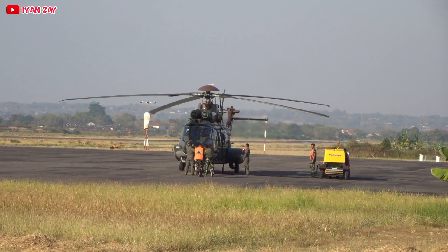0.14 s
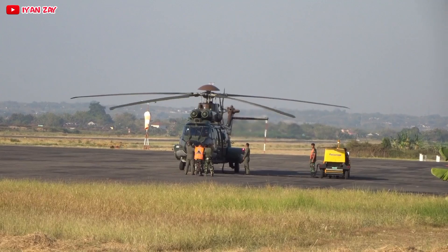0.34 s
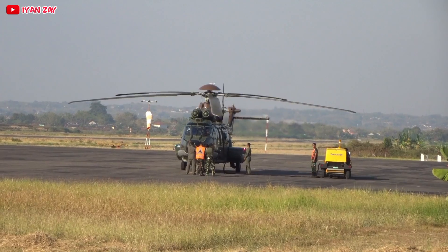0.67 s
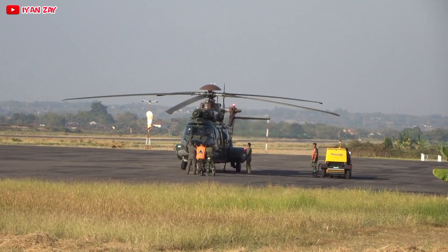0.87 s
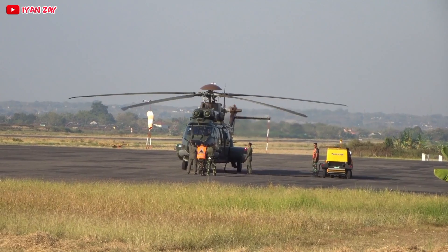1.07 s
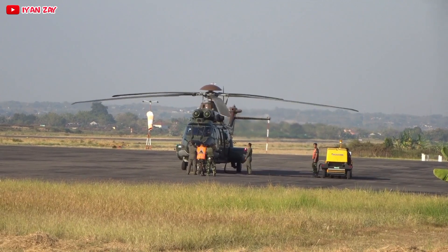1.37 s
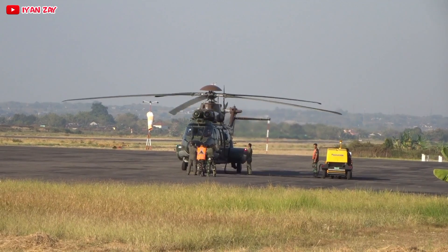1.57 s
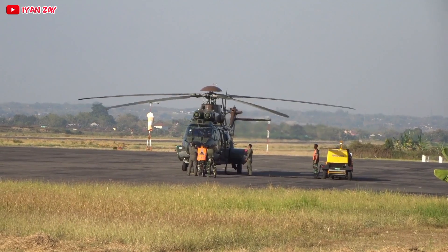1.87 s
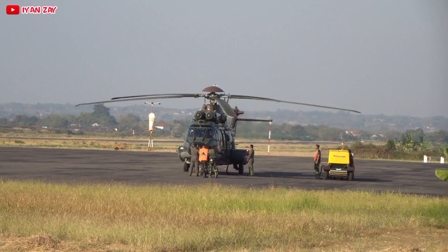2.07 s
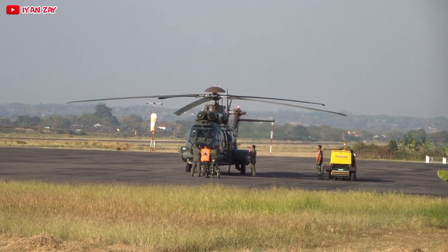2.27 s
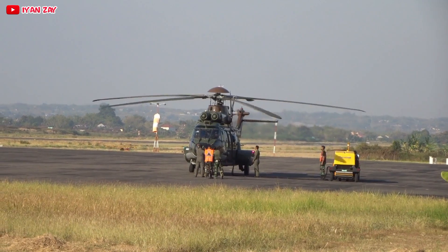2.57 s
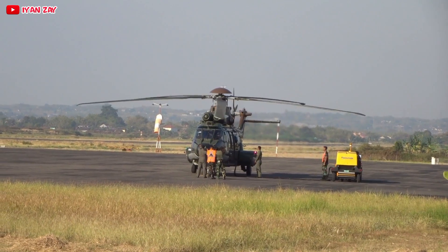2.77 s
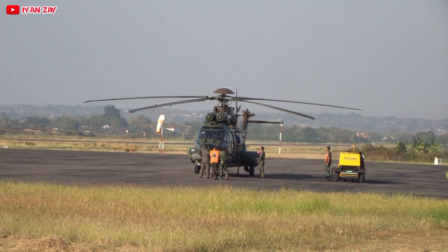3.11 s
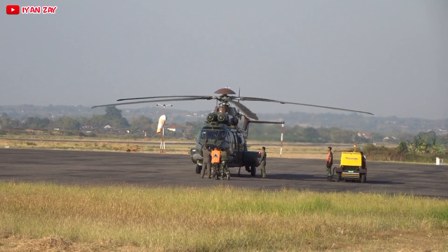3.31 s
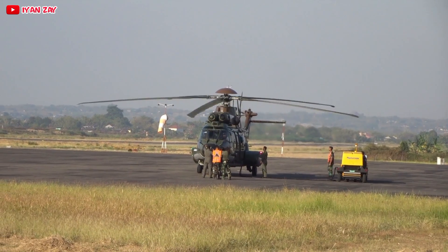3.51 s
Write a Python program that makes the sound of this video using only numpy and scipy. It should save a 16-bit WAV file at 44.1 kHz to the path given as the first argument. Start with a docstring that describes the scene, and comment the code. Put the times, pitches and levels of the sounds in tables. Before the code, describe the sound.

Distant helicopter turbines spool up with fluttering high whines, steady exhaust roar and growing airy rush

```python
"""Three compressor whines climb in pitch and fade in and out in the moving air: a twin-turbine
helicopter runs up on an airfield apron, some way off from the stereo microphones. The whines are tones
with scattered copies; the exhaust roar, its hums and the intake hiss, which swells towards the end,
are coloured noise, and the sliding duct tones are narrow noise. Close by, light gusts (dull noise
bursts) and soft thumps (filtered pulses) reach the microphones."""
import sys
import numpy as np
from scipy import signal
from scipy.fft import irfft
from scipy.io import wavfile

SR = 44100
rng = np.random.default_rng(int(sys.argv[2]) if len(sys.argv) > 2 else 0)


def generate_wav(signal):
    """Clip the signal to [-1, 1] and save it as 16-bit WAV at the path in sys.argv[1]."""
    frames = np.transpose(np.atleast_2d(signal))
    scaled = np.clip(frames, -1, 1) * 32767
    pcm = np.round(scaled).astype(np.int16)
    wavfile.write(sys.argv[1], SR, pcm)


N = 160965
TIME = np.arange(N) / SR   # s
FREQS = np.maximum(np.fft.rfftfreq(N, 1 / SR), 1)   # Hz, kept above zero for the logarithm

# blade-passing pitch of the first engine's lower stage: [t/s, f/Hz]
FIRST_ENGINE_PITCH = [(0, 4040), (.5, 4105), (1, 4183), (1.5, 4271), (2, 4354), (2.5, 4434), (3, 4510),
                      (3.65, 4607)]
# blade-passing pitch of the second engine: [t/s, f/Hz]
SECOND_ENGINE_PITCH = [(0, 7345), (.5, 7470), (1, 7612), (1.5, 7772), (2.5, 8070), (3, 8205), (3.65, 8370)]
# whine of the first engine's lower stage, fading in and out: [t/s, level/dB]
LOWER_STAGE_LEVEL = [(0, -24), (.035, -37), (.065, -29), (.1, -45), (.135, -25.5), (.225, -30), (.28, -26),
                     (.335, -38), (.425, -26), (.51, -38), (.565, -25.5), (.628, -47), (.7, -28.5),
                     (.755, -26.5), (.785, -42), (.815, -25.5), (.853, -40), (.875, -28.5), (.93, -30),
                     (.957, -38), (.985, -32), (1.008, -42), (1.035, -29.5), (1.11, -39), (1.19, -34),
                     (1.22, -26.5), (1.26, -30), (1.285, -38), (1.305, -29), (1.34, -35), (1.42, -35),
                     (1.455, -30.5), (1.505, -41), (1.55, -36), (1.7, -47), (1.98, -38), (2.1, -47),
                     (2.36, -47), (2.44, -36.5), (2.54, -37), (2.65, -46), (3.65, -42)]
# whine of the first engine's upper stage: [t/s, level/dB]
UPPER_STAGE_LEVEL = [(0, -33.5), (.22, -33.5), (.33, -43), (.54, -33), (.93, -47.5), (1.07, -35),
                     (1.65, -36), (2.66, -40), (2.72, -28.5), (2.775, -30.5), (2.82, -40), (2.865, -27.5),
                     (2.91, -39), (3, -27), (3.08, -24.5), (3.15, -24), (3.2, -33), (3.31, -20),
                     (3.425, -25), (3.47, -20.5), (3.55, -22.5), (3.65, -29)]
# whine of the second engine: [t/s, level/dB]
SECOND_ENGINE_LEVEL = [(0, -37), (.4, -38), (.5, -46), (.64, -42), (.76, -47), (1.15, -38.5), (1.5, -30),
                       (1.75, -39), (2.3, -43), (2.42, -31.5), (2.8, -51), (3, -36), (3.15, -49),
                       (3.65, -46)]
# colour of the exhaust roar, before scaling to unit power: [f/Hz, relative density/dB per Hz]
ROAR_COLOUR = [(20, -58), (45, -41), (65, -20), (110, -12.5), (200, -8), (330, -3.5), (590, -3.5),
               (680, 2.5), (810, 2), (900, 1), (1120, 0.5), (1330, 2.5), (1700, 1.5), (2000, -1.5),
               (2800, 0), (5000, -15.5), (11000, -22.5)]
# course of the exhaust roar: [t/s, level/dB]
ROAR_COURSE = [(0, -30.5), (1, -30.5), (2, -29.5), (2.5, -28.5), (3, -26.6), (3.65, -27.5)]
# narrow resonances that hum in the exhaust: [f/Hz, width/Hz, level relative to the roar/dB]
EXHAUST_HUMS = [(559.7, 9.3, -24), (699.4, 12, -18.5), (772, 22, -15), (1307, 36, -17), (1385, 25, -21),
                (1468, 13, -26), (1834, 8.4, -18.5)]
# colour of the intake hiss at low power, before scaling: [f/Hz, relative density/dB per Hz]
HISS_COLOUR = [(1800, -24), (2700, -1), (3400, 4.5), (3900, 5.5), (4450, 0), (5200, -1), (5650, 2),
               (6100, 5.5), (6700, -4), (7200, 1.5), (7900, -1.5), (8500, -11), (9500, -10.5), (11000, -17)]
# course of the intake hiss: [t/s, level/dB]
HISS_COURSE = [(0, -29), (.35, -31.5), (.9, -31), (1.6, -30), (1.9, -32.5), (2.15, -31), (3, -34),
               (3.65, -26)]
# colour of the harder rush that sets in as the air flow grows: [f/Hz, relative density/dB per Hz]
SURGE_COLOUR = [(1900, -31.5), (2600, -6), (3000, -1.5), (3340, 5), (3530, 0.5), (3760, -5.5), (3900, -1.5),
                (4100, 1.5), (4390, -11), (4700, 1.5), (4870, -6), (5150, -20), (5450, -2), (5800, -10.5),
                (6200, -4.5), (6750, 1.5), (7150, -3.5), (7450, -4), (7950, 2.5), (8250, 0), (8450, -10.5),
                (8630, -2), (9050, -16), (11000, -24)]
# course of the harder rush: [t/s, level/dB]
SURGE_COURSE = [(0, -62), (1.9, -33.5), (2.45, -31), (2.72, -26.5), (2.83, -26), (3.05, -21.5), (3.23, -24),
                (3.32, -21), (3.65, -22)]
# duct resonances that sing for a while:
# [middle t/s, length/s, f at the middle/Hz, glide/Hz per s, width/Hz, level/dB]
DUCT_RESONANCES = [(0.075, .44, 7010, -5, 200, -34), (1.349, 0.53, 6070, 200.5, 150, -37),
                   (1.601, 0.12, 3370, -6000, 220, -36), (1.689, 0.17, 2745, -150, 6, -34.5),
                   (1.822, .026, 3320, -25000, 180, -33), (2.301, .77, 6300, 301.5, 270, -34),
                   (2.598, .46, 7860, 205, 140, -31), (2.803, .48, 3420, 0, 130, -37),
                   (2.956, 1.8, 1081, 0, 12, -41), (3.098, 1, 3685, 0.5, 37, -33.5),
                   (3.45, 0.58, 3350, -0.5, 31, -37), (3.558, 0.77, 4740, 152, 270, -31)]
# left-right likeness of the air noise: [f/Hz, correlation]
EAR_LIKENESS = [(40, 0.47), (100, 0.86), (280, 0.8), (700, 0.97), (1500, 0.8), (2900, 0.69), (4500, 0.62),
                (6500, 0.29), (10000, 0.16)]
# stereo balance of the air noise: [f/Hz, left minus right level/dB]
EAR_BALANCE = [(100, -0.5), (700, -0.7), (1400, -2.5), (3000, -.6), (4700, -1.5), (5700, 2.5), (7500, 3.5),
               (10500, 3.5)]
# gusts on the microphones: [middle t/s, length/s, level at the middle/dB]
GUST_BURSTS = [(0.739, .06, -33.5), (0.844, .1, -38), (1.301, 0.027, -36), (1.643, 0.038, -38),
               (2.71, 0.042, -37.5)]
# colour of the gusts, before scaling: [f/Hz, relative density/dB per Hz]
GUST_COLOUR = [(40, -32), (110, -7.5), (190, 4), (330, 1.5), (580, -1.5), (1000, -5), (4000, -58)]
# soft low thumps at the microphones: [start t/s, centre f/Hz, peak level/dB]
THUMP_PULSES = [(.303, 210, -26.5), (.668, 420, -19), (.695, 340, -19), (0.7, 280, -25), (.734, 430, -20),
                (0.747, 270, -23), (.825, 220, -24.5), (1.208, 240, -24.5), (1.306, 300, -25),
                (1.657, 330, -24.5)]

UPPER_STAGE_RATIO = 17 / 11   # upper stage pitch over lower stage pitch
SCATTER_HZ = 23.6   # spread of the sound scattered by the air
SKIRT, SKIRT_HZ = 0.15, 74.6   # depth (re the steady tone) and rate of the flow's faster unsteadiness
FIRST_SCATTER, SECOND_SCATTER = 0.35, 0.46   # scattered sound relative to the steady tone, per engine
SECOND_PAN_DB = -0.5   # left minus right
AIR_LEFT_LAG_S = 1.4e-5   # air noise reaches the right microphone a little sooner
THUMP_SPAN = 1.76   # a thump's band reaches this factor below and above its centre
THUMP_RIGHT_LAG_S = 0.00053   # thumps reach the left microphone first
THUMP_LOW_CUT_HZ = 140   # little of a thump passes below this
CUTOFF_HZ = 11060   # top of the recorded band


def from_db(db):
    """Decibels to amplitude gain."""
    return 10 ** (np.asarray(db) / 20)


def rms_one(x):
    """Scale to unit power, over both channels together."""
    return x / np.sqrt(np.mean(np.abs(x) ** 2) + 1e-20)


def in_time(rows):
    """Read a time curve at every sample."""
    return np.interp(TIME, *np.transpose(rows))


def by_frequency(rows):
    """Read a spectrum table at every frequency, along a logarithmic axis."""
    hz, value = np.transpose(rows)
    return np.interp(np.log(FREQS), np.log(hz), value)


def pan(db):
    """Left and right gains for a left-minus-right level difference."""
    return from_db(np.array([[1], [-1]]) * db / 2)


def swell(middle, length):
    """Bell-shaped envelope that peaks at one."""
    return np.exp(-2 * ((TIME - middle) / length) ** 2)


def resonance(hz, width):
    """Narrow spectral peak of unit power."""
    return rms_one(1 / (1 + 2 * ((FREQS - hz) / width) ** 2))


def flutter(rate_hz):
    """Two unrelated slow random signals of unit spread, their spectrum falling above the rate."""
    real, imag = rng.standard_normal((2, 2, len(FREQS)))
    spectrum = (real + 1j * imag) / (1 + (FREQS / rate_hz) ** 2)
    return rms_one(irfft(spectrum, N))


def air_spectrum(gain):
    """Spectrum of stereo turbulence: random, coloured, less alike at the two ears towards the treble."""
    real, imag = rng.standard_normal((2, 2, len(FREQS)))
    mid, side = real + 1j * imag
    alike = np.clip(by_frequency(EAR_LIKENESS), -1, 1)
    both = np.sqrt(1 + alike) * mid + np.sqrt(1 - alike) * side * [[1], [-1]]
    both[0] *= np.exp(-2j * np.pi * FREQS * AIR_LEFT_LAG_S)
    return both * gain * pan(by_frequency(EAR_BALANCE))


def air_noise(gain):
    """Stereo turbulence as sound of unit power."""
    return rms_one(irfft(air_spectrum(gain), N))


def whine(pitch_hz, level, left_lead_rad, scatter):
    """Blade-passing tone plus scattered copies, different at each ear, and a faster shared unsteadiness."""
    scattered = scatter * (flutter(SCATTER_HZ) + 1j * flutter(SCATTER_HZ)) / np.sqrt(2)
    depth, wobble = SKIRT * flutter(SKIRT_HZ)
    phase = 2 * np.pi * np.cumsum(pitch_hz) / SR
    carrier = np.exp(1j * (phase + np.array([[left_lead_rad], [0]])))
    tone = (carrier * (1 + scattered + depth + 1j * wobble)).real
    return from_db(in_time(level)) * rms_one(tone)


def compressors():
    """Two stages locked in ratio on the first engine's shaft, and one tone from the second engine."""
    first_hz = in_time(FIRST_ENGINE_PITCH)
    second_hz = in_time(SECOND_ENGINE_PITCH)
    lower = whine(first_hz, LOWER_STAGE_LEVEL, left_lead_rad=-0.75, scatter=FIRST_SCATTER)
    upper = whine(first_hz * UPPER_STAGE_RATIO, UPPER_STAGE_LEVEL, left_lead_rad=-0.93, scatter=FIRST_SCATTER)
    second = whine(second_hz, SECOND_ENGINE_LEVEL, left_lead_rad=-1.24, scatter=SECOND_SCATTER)
    return lower + upper + pan(SECOND_PAN_DB) * second


def rush(colour, course, waver_db, waver_hz):
    """Gas flow noise that wavers a little on its way across the field."""
    level_db = in_time(course) + waver_db * flutter(waver_hz)[0]
    return air_noise(from_db(by_frequency(colour))) * from_db(level_db)


def hums():
    """Breathy exhaust tones: noise through narrow resonances, following the level of the roar."""
    power = sum((from_db(db) * resonance(hz, width)) ** 2 for hz, width, db in EXHAUST_HUMS)
    return np.sqrt(np.mean(power)) * air_noise(np.sqrt(power)) * from_db(in_time(ROAR_COURSE))


def exhaust():
    """Broad roar of the exhaust gas with its hums."""
    return rush(ROAR_COLOUR, ROAR_COURSE, waver_db=0.52, waver_hz=4.9) + hums()


def intakes():
    """Hiss of air drawn in, joined by a harder rush as the flow grows."""
    hiss = rush(HISS_COLOUR, HISS_COURSE, waver_db=1.04, waver_hz=11.0)
    surge = rush(SURGE_COLOUR, SURGE_COURSE, waver_db=0.75, waver_hz=18)
    return hiss + surge


def ducts():
    """Breathy tones that come and go: noise through one resonance each, some sliding in pitch."""
    out = 0
    for middle, length, hz, glide, width, db in DUCT_RESONANCES:
        # the one-sided spectrum gives a complex tone, so a turning phase can shift its pitch
        breath = np.fft.ifft(air_spectrum(resonance(hz, width)), N)
        tone = breath * np.exp(1j * np.pi * glide * (TIME - middle) ** 2)
        envelope = swell(middle, length)
        envelope_rms = np.sqrt(np.mean(envelope ** 2))
        out = out + from_db(db) * envelope_rms * rms_one(envelope * tone.real)
    return out


def gusts():
    """Short dull rumbles of air on the microphones: low noise under bell-shaped swells."""
    envelope = sum(from_db(db) * swell(middle, length) for middle, length, db in GUST_BURSTS)
    return air_noise(from_db(by_frequency(GUST_COLOUR))) * envelope


def thumps():
    """Single soft pressure pulses close by: clicks through a band filter, dying away quickly."""
    out = np.zeros((2, N))
    low_cut = signal.butter(2, THUMP_LOW_CUT_HZ, "high", fs=SR, output="sos")
    click = signal.sosfilt(low_cut, signal.unit_impulse(SR // 20))
    for s, hz, db in THUMP_PULSES:
        band = signal.butter(2, [hz / THUMP_SPAN, hz * THUMP_SPAN], "band", fs=SR, output="sos")
        pulse = signal.sosfilt(band, click)
        pulse = from_db(db) * pulse / np.abs(pulse).max()
        for ear, arrival in zip(out, (s, s + THUMP_RIGHT_LAG_S)):
            start = int(arrival * SR)
            ear[start:start + len(pulse)] += pulse
    return out


def scene():
    """Helicopter whines, exhaust, intakes and ducts, with gusts and thumps at the microphones."""
    return compressors() + exhaust() + intakes() + ducts() + gusts() + thumps()


def record(dry):
    """Steep low-pass: almost nothing is kept above the cutoff."""
    return signal.sosfilt(signal.ellip(16, .1, 90, CUTOFF_HZ, fs=SR, output="sos"), dry)


dry = scene()
out = record(dry)
generate_wav(out)
```